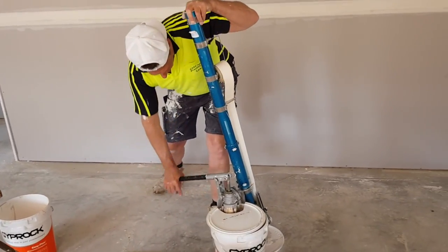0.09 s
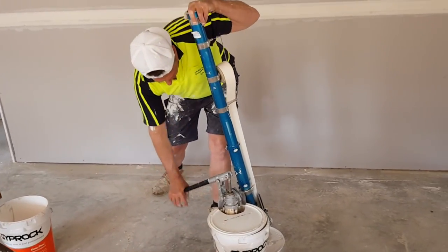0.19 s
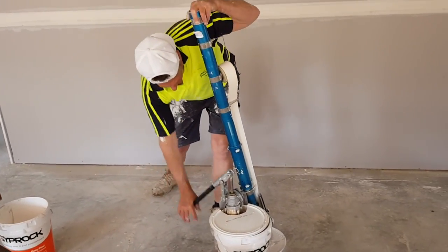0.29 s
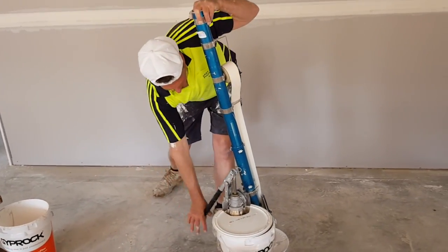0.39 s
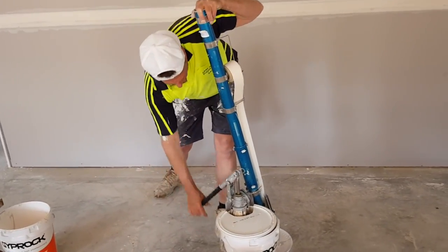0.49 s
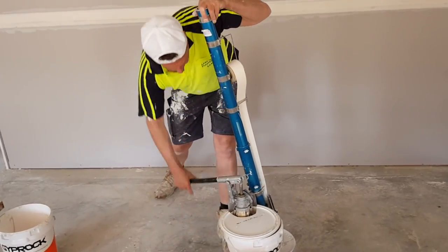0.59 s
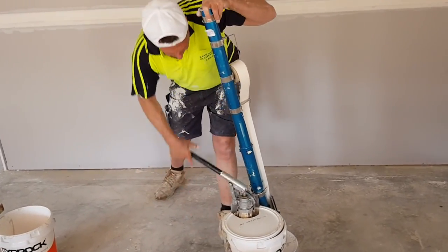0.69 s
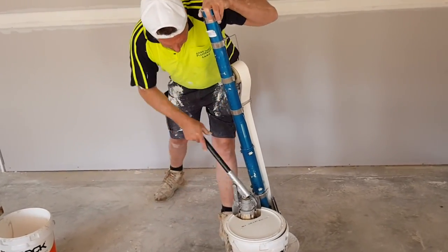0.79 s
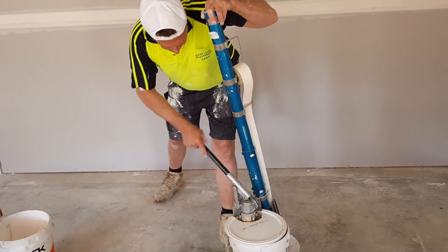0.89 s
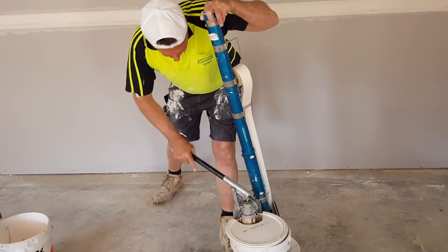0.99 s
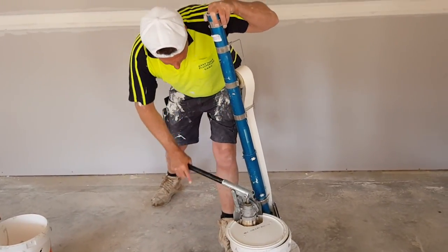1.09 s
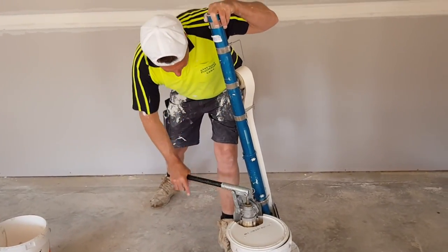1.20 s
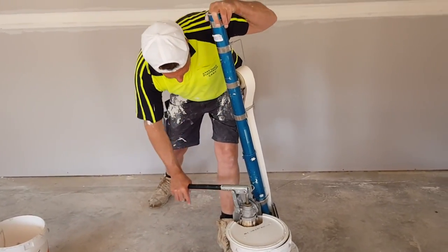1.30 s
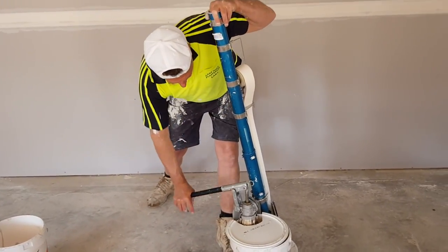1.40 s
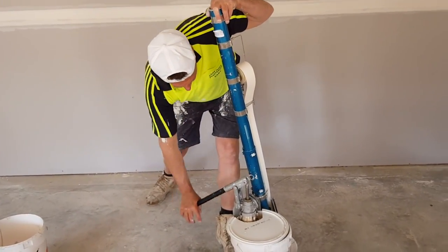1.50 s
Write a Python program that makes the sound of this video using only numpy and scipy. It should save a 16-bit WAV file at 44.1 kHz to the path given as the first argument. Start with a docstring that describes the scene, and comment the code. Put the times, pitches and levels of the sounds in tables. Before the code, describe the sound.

A hand pump works in a bucket of thick paste, in a bare, reverberant room. Faint sliding hiss and soft bucket thumps begin; a thin, high metal squeak at 0.2-0.3 s, a sharp clack at 0.4, wet plops to 0.54, a faint chirp and piercing squeals at 0.55-0.67, a rough creak at 0.7, plops, a ringing clack at 0.86, dull knock at 0.99, last soft plops, then quiet hiss to 1.5.

```python
"""Hand pump in a bucket

One stroke of a hand pump that stands in a bucket of joint compound, in a bare, echoing room.
The lever pivot squeaks and squeals as gliding friction tones; the seal creaks as a rough one, with rasp and hum.
The handle clacks against its stops: cracks and rattles of coloured noise, then decaying body modes.
Thick compound plops as short sine pops over squelching grains, and the bucket thumps as low decaying sines.
The piston slides with a faint, uneven noise hiss over a quiet rumble of the room.
"""
import sys
import numpy as np
from scipy import signal
from scipy.fft import rfft, irfft
from scipy.io import wavfile
from scipy.ndimage import uniform_filter1d

SR = 44100
rng = np.random.default_rng(int(sys.argv[2]) if len(sys.argv) > 2 else 0)


def master_out(mix):
    """Clip the mix to full scale and print it as 16-bit PCM to the path in sys.argv[1]."""
    frames = np.transpose(np.atleast_2d(mix))
    ceiling = np.clip(frames, -1, 1)
    pcm = np.round(ceiling * 32767).astype(np.int16)
    wavfile.write(sys.argv[1], SR, pcm)


N = 66150  # samples, 1.5 s


def amp(db):
    """Decibels to gain."""
    return 10 ** (np.asarray(db) / 20)


def unit(x):
    """Scales to rms 1."""
    return x / np.sqrt(np.mean(x ** 2) + 1e-20)


def read(points, hz):
    """Reads a spectrum table on a log-frequency axis."""
    f, value = np.transpose(points)
    return np.interp(np.log(hz + 1), np.log(f + 1), value)


def follow(curve, column=1):
    """One column of a time curve at every sample."""
    rows = np.transpose(curve)
    return np.interp(np.arange(N) / SR, rows[0], rows[column])


def since(start):
    """Seconds since start, zero before it."""
    return np.maximum(np.arange(N) / SR - start, 0)


def pan(x, db):
    """Places a sound with the left side db above the right."""
    return x * amp([[db / 2], [-db / 2]])


def colour(x, points):
    """Causal minimum-phase filter of unit energy, shaped by a spectrum table."""
    size = 4096
    hz = abs(np.fft.fftfreq(size, 1 / SR))
    log_gain = np.log(amp(read(points, hz)))
    # The Hilbert transform of the log gain supplies the minimum phase
    response = np.exp(np.conj(signal.hilbert(log_gain)))
    taps = np.fft.ifft(response).real[:size // 2]
    return signal.fftconvolve(x, taps / np.linalg.norm(taps))[:N]


def wobble(rate_hz):
    """Smooth random motion of rms 1: noise under a Gaussian low-pass."""
    lowpass = np.exp(-(np.fft.rfftfreq(N, 1 / SR) / rate_hz) ** 2)
    return unit(irfft(rfft(rng.standard_normal(N)) * lowpass, N))


def diffuse(a, b):
    """Two unrelated signals become a stereo pair that is most alike in the bass."""
    # Left-right likeness: f/Hz, correlation (0 to 1)
    likeness = [(30, 0.47), (150, 0.96), (400, 0.17), (1000, 0.1), (15000, 0.067)]
    same = np.clip(read(likeness, np.fft.rfftfreq(N, 1 / SR)), 0, 1)
    right = irfft(same * rfft(a) + np.sqrt(1 - same ** 2) * rfft(b), N)
    return np.array([a, right])


def room(x, wet_db):
    """Adds the echo of bare walls and concrete, each band of noise dying at its own speed."""
    # Decay time of the room: f/Hz, t60/s
    decay_times = [(100, 0.88), (300, 0.47), (800, 1.42), (2000, 1.24), (4000, 0.85), (5600, 0.84),
                   (8000, 0.98), (11400, 0.41), (15000, 0.4)]
    onset_s = 0.0024  # both the silence before the echo and its fade-in
    early_db, early_s = 4, 0.01  # floor and near wall throw back more during the first moments
    hz, t, z = signal.stft(diffuse(*rng.standard_normal((2, N))), SR, nperseg=256)
    decay = amp(-60 * t / read(decay_times, hz)[:, None])
    tail = signal.istft(z * decay, SR, nperseg=256)[1][:, :N]
    age = since(onset_s)
    tail = tail * np.minimum(age / onset_s, 1) * amp(early_db * np.exp(-age / early_s))
    tail = tail / np.linalg.norm(tail[0])
    mono = x.mean(0)[None]
    return x + amp(wet_db) * signal.fftconvolve(mono, tail, axes=1)[:, :N]


def stick_slip(curve, harmonics_db, jitter, jitter_hz):
    """A friction tone on a pitch and level curve, its pitch unsteady by jitter (rms fraction)."""
    t = np.arange(N) / SR
    pitch = follow(curve) * (1 + jitter * wobble(jitter_hz))
    phase = 2 * np.pi * np.cumsum(pitch) / SR
    sounding = (t > curve[0][0]) & (t < curve[-1][0])
    level = uniform_filter1d(amp(follow(curve, column=2)) * sounding, size=90)  # 2 ms soft edges
    return level * sum(amp(db) * np.sin((k + 1) * phase) for k, db in enumerate(harmonics_db))


def burst(start, decay_s):
    """A puff of noise that starts at once and dies away."""
    t = since(start)
    return (t > 0) * np.exp(-t / decay_s) * rng.standard_normal(N)


def click(start):
    """A single impulse."""
    return 1. * (np.arange(N) == round(start * SR))


def wash(spectrum):
    """Steady, coloured stereo noise of rms 1."""
    left, right = [colour(noise, spectrum) for noise in rng.standard_normal((2, N))]
    return unit(diffuse(left, right))


def rumble():
    """Quiet rumble of the room: steady noise, strongest in the bass."""
    # Colour of the rumble: f/Hz, level/dB
    rumble_colour = [(20, -17), (45, 0.5), (70, 1.5), (130, 3), (200, -5), (320, -28.5), (700, -28.5),
                     (2000, -10), (6000, -20.5), (15000, -33.5)]
    return amp(-61.5) * wash(rumble_colour)


def piston():
    """Uneven hiss of the piston sliding in its barrel: noise on a level curve that flutters."""
    # Level of the slide: t/s, level/dB
    slide = [(0, -51), (.09, -53.5), (.19, -55.5), (.27, -54), (.39, -52.5), (.5, -55), (.62, -58.5),
             (.8, -58), (.98, -67), (1.1, -53.5), (1.22, -55.5), (1.36, -55.5), (1.42, -51), (1.5, -52.5)]
    # Colour of the hiss: f/Hz, level/dB
    slide_colour = [(30, -44), (100, -4.5), (300, -12.5), (700, -2.5), (1100, -0.5), (2000, 1),
                    (3000, -2.5), (5800, -4), (7500, -13), (10000, -14.5), (12000, -25), (15000, -25.5)]
    flutter_db = 0.75 * wobble(rate_hz=82)
    return pan(wash(slide_colour) * amp(follow(slide) + flutter_db), db=-0.3)


def bucket():
    """The pump rocks in the plastic bucket: low decaying sines, each with a dull tick of varying strength."""
    # Soft thumps: t/s, f/Hz, level/dB, decay/s, tick level/dB, left over right/dB
    thumps = [(0.0606, 132.3, -51, 0.033, -26, -21.5), (0.076, 118, -45.5, 0.018, -51, 1),
              (0.111, 127.6, -43.5, 0.011, -62, -8), (0.1488, 129.6, -38.5, 0.008, -21, -11.5),
              (0.267, 151.8, -47.5, 0.068, -54, 0), (0.408, 171, -50, 0.031, -56, -3),
              (0.439, 226.5, -44.5, 0.018, -46, -2), (0.531, 227.5, -41.5, 0.014, -54, 5),
              (0.549, 150, -42.5, 0.009, -54, 0), (0.573, 89, -46, 0.0265, -40, 0),
              (0.596, 137, -47.5, .015, -58, -3), (0.871, 155, -47, 0.024, -58, -4),
              (0.956, 144, -49.5, 0.024, -45, 3), (.978, 89, -45.5, 0.014, -26, -3)]
    # Colour of the tick: f/Hz, level/dB
    tick_colour = [(25, -5), (100, 7.5), (300, 8), (700, -1), (1400, -4), (2200, -5), (4000, -28),
                   (8000, -43), (15000, -46.5)]
    out = np.zeros((2, N))
    for start, hz, db, decay_s, tick_db, side_db in thumps:
        t = since(start)
        thump = amp(db) * np.exp(-t / decay_s) * np.sin(2 * np.pi * hz * t)
        tick = amp(tick_db) * colour(click(start), tick_colour)
        out += pan(thump + tick, side_db)
    return room(out, wet_db=-13)


def squelch():
    """Compound squelches through the valve: many tiny coloured clicks at random moments."""
    # Level of the squelch: t/s, level/dB
    squelch_level = [(0, -54.5), (.1, -56), (.2, -76.5), (.3, -62), (.4, -55), (.49, -52), (.56, -51.5),
                     (.64, -62), (.75, -64), (.83, -60.5), (.98, -56), (1.1, -61), (1.25, -73.5),
                     (1.5, -69.5)]
    # Colour of the grains: f/Hz, level/dB
    squelch_colour = [(60, -10), (200, 8), (330, 1.5), (480, 6.5), (800, -2.5), (1100, -5), (2000, -2),
                      (6000, -42), (15000, -76)]
    grains_per_s, spread_db = 580, 2
    sizes_db = spread_db * np.minimum(rng.exponential(1, N), 4)
    sizes = amp(sizes_db) * rng.choice([-1, 1], N)
    hits = rng.random(N) < grains_per_s / SR
    grains = unit(colour(sizes * hits, squelch_colour))
    return pan(grains * amp(follow(squelch_level)), db=9)


def plops():
    """Air pockets pop in the thick paste: rough sines that swell, die and rise in pitch."""
    # Pops: t/s, starting f/Hz, level/dB, left over right/dB
    pops = [(.348, 500, -49.5, 20), (.463, 697, -37.5, 8), (.485, 720, -41.5, 13), (.505, 754, -39, 9),
            (.539, 750, -46.5, 17), (.673, 634, -47.5, 20), (.804, 667, -41.5, 20), (.823, 697, -37, 17.5),
            (.839, 670, -44, 12), (1.013, 660, -47, 6), (1.058, 690, -52.5, 18)]
    rise_s = .0017  # time to the peak of a pop
    glide, rough = 0.014, 0.34  # upward bend of the phase per rise time, rms depth of the roughness
    out = np.zeros((2, N))
    for start, hz, db, side_db in pops:
        t = since(start)
        age = t / rise_s
        tone = np.sin(2 * np.pi * hz * t * (1 + glide * age))
        pop = tone * (1 + rough * wobble(rate_hz=310))
        swell = age * np.exp(1 - age)
        out += pan(amp(db) * swell * pop, side_db)
    return out


def compound():
    """Air pockets pop in the thick paste, over a squelch of many tiny ones, all in one room."""
    return room(squelch() + plops(), wet_db=-8)


def seal():
    """The seal sticks and slips in a short, rough, nasal creak; the hollow barrel hums with it."""
    # Creak: t/s, f/Hz, level/dB (ahead of the harmonic, rasp and hum levels)
    creak = [(.703, 700, -50), (.7062, 700, -32), (.716, 695, -39), (.732, 698, -36), (.746, 705, -43),
             (.785, 705, -52), (.83, 705, -64)]
    # Harmonics of the creak, from the fundamental up: level/dB
    harmonics_db = [-7.5, -11, -5.5, -17]
    # Colour of the rasp: f/Hz, level/dB
    rasp_colour = [(400, -32.5), (700, -4.5), (1100, -25.5), (1450, 0.5), (1700, -4), (2000, -4),
                   (2500, -14.5), (3200, -11), (5000, -46), (15000, -68)]
    jitter, flutter = .03, .4  # rms fractions of pitch and of level
    barrel_hz, barrel_width_hz = 760, 80
    tone = stick_slip(creak, harmonics_db, jitter, jitter_hz=230)
    tone = tone * (1 + flutter * wobble(rate_hz=140))
    rasp = stick_slip(creak, [-7], jitter, jitter_hz=223) * rng.standard_normal(N)
    rasp = colour(rasp, rasp_colour)
    # The barrel takes the creak's level curve at its own pitch
    barrel_curve = [(s, barrel_hz, db) for s, _, db in creak]
    barrel = stick_slip(barrel_curve, [-6], barrel_width_hz / barrel_hz / 2, jitter_hz=204.5)
    return room(pan(tone + rasp + barrel, db=-5.0), wet_db=0)


def knock():
    """The handle knocks dully as it turns back down: one short puff of coloured noise."""
    # Colour of the knock: f/Hz, level/dB
    knock_colour = [(30, -20), (100, -7), (500, -9), (1000, -8), (1400, 3.5), (1800, -17), (3000, -27),
                    (4000, -8), (6000, -26), (12000, -42)]
    thud = amp(-41) * colour(burst(.986, decay_s=.009), knock_colour)
    return room(pan(thud, db=0.0), wet_db=-9)


def clacks():
    """The handle hits a stop: a sharp crack, a short rattle and the ring of the pump body."""
    # Lower, then upper stop: t/s, crack level/dB, rattle level/dB, rattle decay/s, ring level/dB,
    # left over right/dB
    stops = [(.4040, -26.5, -36, 0.011, -47, -4), (0.8564, -29.5, -36, 0.011, -30.5, 1.5)]
    # Colour of the lower and of the upper stop, one list each: f/Hz, level/dB
    stop_colours = [
        [(30, -15), (100, -13), (220, -2.5), (330, -8.5), (480, -4.5), (700, 5.5), (1100, -4.5), (1900, 4),
         (3200, 0.5), (4600, 0.5), (6200, -8.5), (8000, -18.5), (11000, -17), (15000, -68)],
        [(30, -24), (100, -7), (220, -4), (330, -4), (700, 3), (1100, -3.5), (2300, 8), (4200, 2), (6200, -5),
         (8000, -17), (11000, -5), (15000, -27)],
    ]
    # Modes of the pump body: f/Hz, level/dB (ahead of the ring level), t60/s
    body = [(1689, -6.5, 0.054), (1883, -4, 0.071), (1964, -7, 0.063), (2042, 3, 0.051), (2208, -7, .07),
            (2376, -2, 0.052), (2540, -7, 0.035), (2674, -20, 0.037), (2990, -48, 0.056)]
    snap_db, crack_decay_s, ring_rise_s = 9.5, 0.0013, .007  # snap is the impulse inside the crack
    out = np.zeros((2, N))
    for (start, crack_db, rattle_db, decay_s, ring_db, side_db), spectrum in zip(stops, stop_colours):
        t = since(start)
        crack = amp(crack_db) * (amp(snap_db) * click(start) + burst(start, crack_decay_s))
        rattle = amp(rattle_db) * burst(start, decay_s)
        blow = colour(crack + rattle, spectrum)
        ring = np.zeros(N)
        for hz, level, t60 in body:
            ring += amp(level - 60 * t / t60) * np.sin(2 * np.pi * (hz * t + rng.random()))
        swell = np.minimum(t / ring_rise_s, 1)
        out += pan(blow + amp(ring_db) * swell * ring, side_db)
    return room(out, wet_db=3)


def rod():
    """Faint chirp of the rod: a friction tone with unsteady pitch."""
    # Chirp: t/s, f/Hz, level/dB
    chirp = [(.552, 2513, -60), (.566, 2482, -43), (.580, 2505, -41), (.592, 2500, -63)]
    tone = stick_slip(chirp, [0], jitter=0.011, jitter_hz=200)
    return room(pan(tone, db=-4.0), wet_db=-1.5)


def pivot():
    """Dry metal squeaks on the way down and squeals an octave or more higher on the way up."""
    # Squeak, lever pushed down: t/s, f/Hz, level/dB (ahead of the harmonic levels)
    squeak = [(.200, 5735, -56), (.218, 5688, -31), (.234, 5655, -27), (.255, 5615, -24), (.270, 5598, -32),
              (.295, 5600, -50)]
    # Squeal, lever lifted, hopping between modes; one curve per mode: t/s, f/Hz, level/dB (ahead of the gain)
    squeals = [
        [(.554, 11290, -56), (.564, 11380, -28), (.571, 11425, -26), (.578, 11430, -33), (.592, 11418, -36),
         (.61, 11415, -54)],
        [(.603, 14660, -58), (.612, 14700, -43), (.626, 14720, -37), (.645, 14770, -37), (.655, 14700, -55)],
        [(.628, 14000, -48), (.634, 13900, -34), (.640, 13750, -33), (.646, 12600, -35), (.650, 11830, -32),
         (.659, 11730, -35), (.668, 11000, -46)],
    ]
    # Per squeal mode: pitch unsteadiness (rms fraction), left over right/dB
    manner = [(.001, -5), (.003, 0), (.013, 0)]
    # Fundamental and octave
    down = stick_slip(squeak, [0.5, -16], jitter=.0012, jitter_hz=150)
    up = np.zeros((2, N))
    for curve, (jitter, side_db) in zip(squeals, manner):
        up += pan(stick_slip(curve, [4.5], jitter, jitter_hz=420), side_db)
    return room(pan(down, db=-1.5), wet_db=5) + room(up, wet_db=1)


def scene():
    """The pump at work over the quiet rumble of the room."""
    background = rumble() + piston()
    paste_and_bucket = bucket() + compound()
    return background + paste_and_bucket + seal() + knock() + clacks() + rod() + pivot()


def record(dry):
    """The sound reaches the right microphone port a little later; then the band limit."""
    port_delay_s, edge_hz = .000022, 15700
    # A delay shorter than a sample, as a phase slope
    delay = np.exp(-2j * np.pi * np.fft.rfftfreq(N, 1 / SR) * port_delay_s)
    late = irfft(rfft(dry[1]) * delay, N)
    lowpass = signal.firwin(511, edge_hz, window=("kaiser", 9), fs=SR)
    return signal.oaconvolve(np.array([dry[0], late]), lowpass[None], "same")


dry = scene()
out = record(dry)
master_out(out)
```